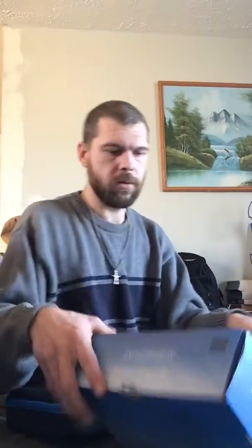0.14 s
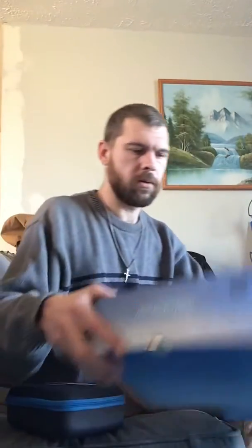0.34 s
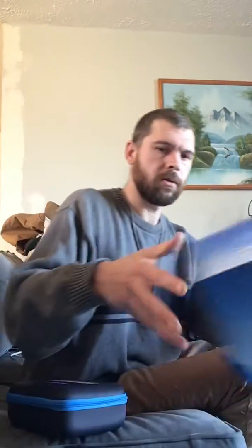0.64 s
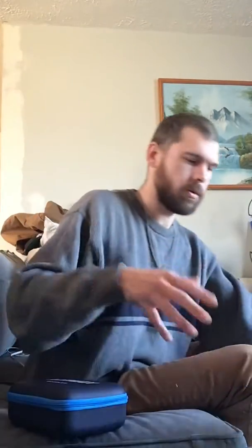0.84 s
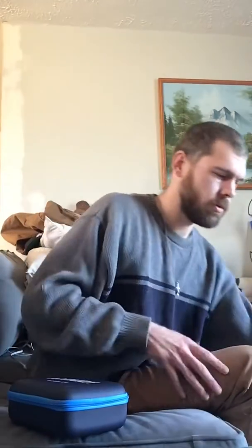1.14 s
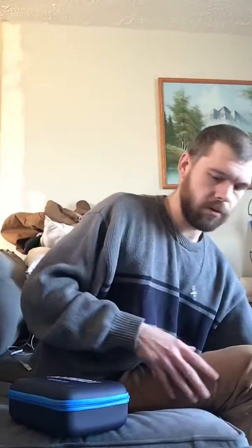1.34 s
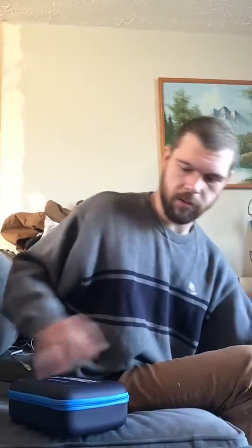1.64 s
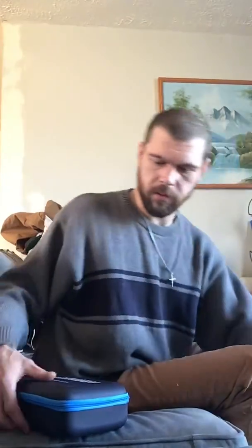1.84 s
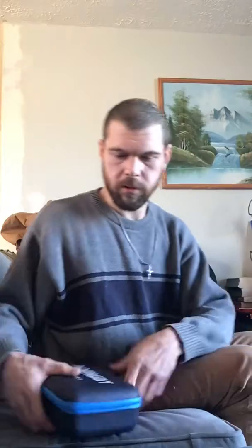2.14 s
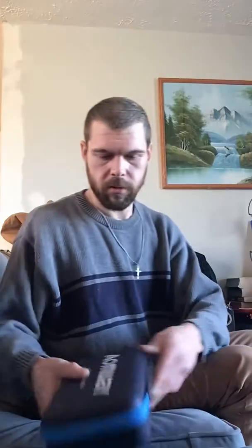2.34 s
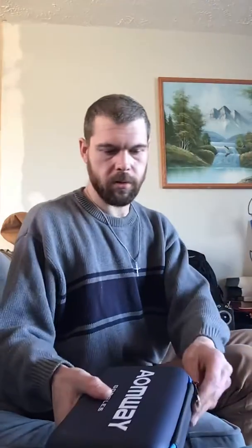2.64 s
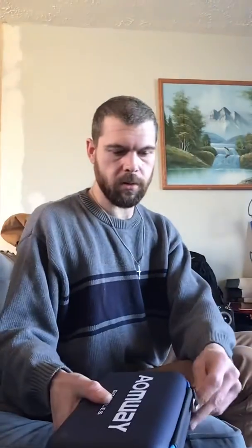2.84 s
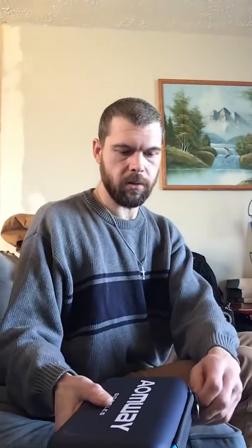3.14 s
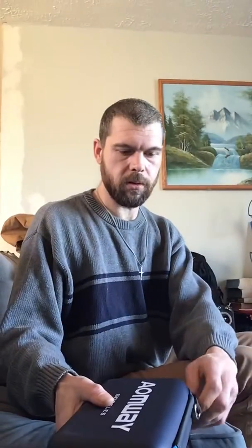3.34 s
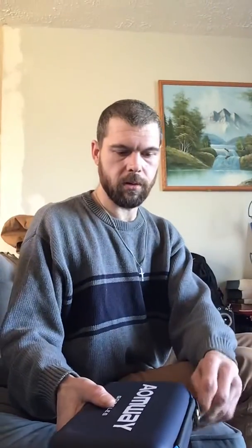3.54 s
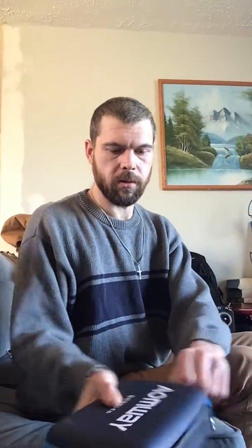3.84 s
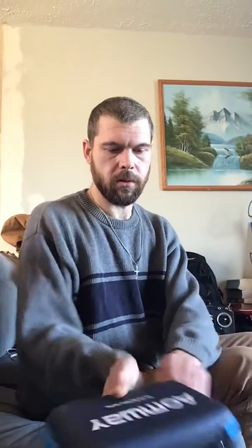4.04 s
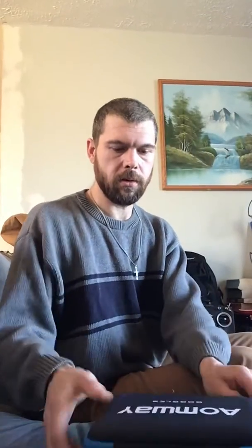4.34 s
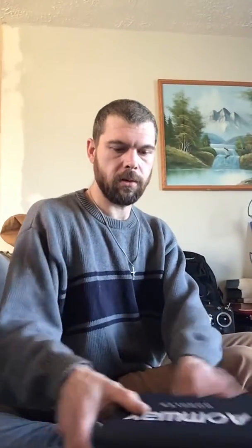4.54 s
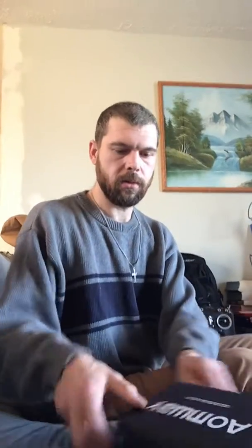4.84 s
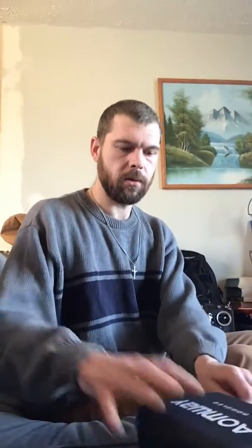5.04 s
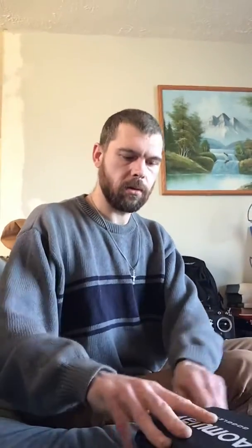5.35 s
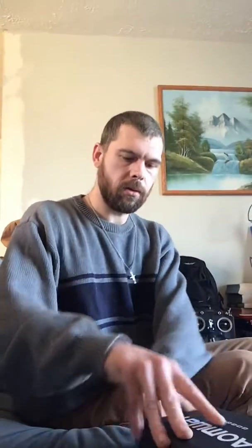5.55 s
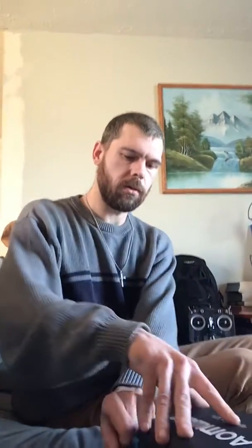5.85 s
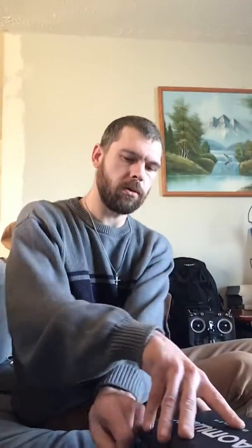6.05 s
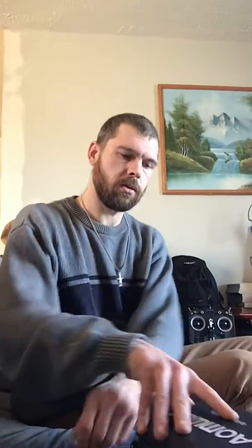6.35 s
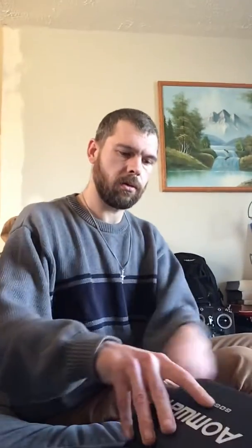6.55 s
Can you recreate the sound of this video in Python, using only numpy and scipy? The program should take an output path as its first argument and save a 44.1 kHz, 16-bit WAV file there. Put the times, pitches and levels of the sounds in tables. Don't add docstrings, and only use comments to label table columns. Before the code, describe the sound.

An empty cardboard box is rubbed, dropped aside with a boomy double bounce, then a hard case is handled and its zipper drawn in short rasps.

```python
import sys
import numpy as np
from scipy import signal
from scipy.fft import rfft, irfft, next_fast_len
from scipy.io import wavfile
from scipy.ndimage import uniform_filter1d

SR = 44100
rng = np.random.default_rng(int(sys.argv[2]) if len(sys.argv) > 2 else 0)


def log_audio(samples):
    frames = np.atleast_2d(samples).T
    limited = np.clip(frames, -1, 1)
    pcm = np.round(limited * 32767).astype(np.int16)
    wavfile.write(sys.argv[1], SR, pcm)


def to_linear_factor(level_db):
    exponent = np.asarray(level_db, float) / 20
    return 10 ** exponent


N = 294588


def evened(x):
    return x / np.sqrt(np.mean(x ** 2) + 1e-20)


def read(points, hz):
    f, value = np.transpose(points)
    return np.interp(np.log(hz + 1), np.log(f + 1), value)


def add(mix, s, sound):
    part = mix[round(s * SR):][:len(sound)]
    part += sound[:len(part)]


def coloured(x, points):
    size = next_fast_len(len(x))
    gain = to_linear_factor(read(points, np.fft.rfftfreq(size, 1 / SR)))
    return evened(irfft(rfft(x, size) * gain, size)[:len(x)])


def resonant(x, peaks):
    out = np.zeros(len(x))
    for k, (hz, width, db) in enumerate(peaks):
        r = np.exp(-np.pi * width / SR)
        poles = [1, -2 * r * np.cos(2 * np.pi * hz / SR), r * r]
        out += (-1) ** k * to_linear_factor(db) * (1 - r) * signal.lfilter([1, 0, -1], poles, x)
    return evened(out)


def ring(hz, t60, rise=0.00078):
    t = np.arange(round(0.36 * SR)) / SR
    return np.sin(2 * np.pi * hz * t) * to_linear_factor(-60 * t / max(t60, 0.003)) * (1 - np.exp(-t / rise))


def grit(per_s, spread_db):
    size = to_linear_factor(spread_db * np.minimum(rng.exponential(1, N), 4))
    return size * rng.standard_normal(N) * (rng.random(N) < per_s / SR)


def patchy(x, spread_db, frames_long, bins_wide):
    z = signal.stft(x, nperseg=256)[2]
    patches = rng.standard_normal(z.shape[::-1]).T
    patches = uniform_filter1d(uniform_filter1d(patches, bins_wide, 0), frames_long, 1)
    z = z * to_linear_factor(spread_db * evened(patches))
    return evened(signal.istft(z, nperseg=256)[1][:len(x)])


# (frequency [Hz], level [dB per Hz])
AIR_COLOUR = [(15, -44), (25, -1.5), (120, -3.5), (242, -7), (354, -2), (476, -13), (775, -9), (887, -18.5),
              (1230, -10.5), (1740, -15.5), (2280, -18), (2990, -19), (10100, -32), (12900, -32),
              (16000, -44)]
AIR_DB = -61
# (frequency [Hz], width [Hz], level [dB])
HUM = [(113.7, 8.7, -66.5), (149, 14, -69), (240, 18, -68.5)]


def air():
    frames, hz = N // 256 + 5, np.fft.rfftfreq(1024, 1 / SR)
    a, b, patches = rng.standard_normal((frames, 513, 3)).T
    patches = evened(uniform_filter1d(uniform_filter1d(patches, 20, 0), 12, 1))
    z = (a + 1j * b) * to_linear_factor(read(AIR_COLOUR, hz)[:, None] + 2.75 * patches)
    floor = signal.istft(z, nperseg=1024, noverlap=768)[1][:N]
    hum = sum(to_linear_factor(db) * resonant(rng.standard_normal(N), [(f, w, 0)]) for f, w, db in HUM)
    return to_linear_factor(AIR_DB) * evened(floor) + hum


# (frequency [Hz], time to fall 60 dB [s])
ECHO_TIMES = [(100, 0.35), (500, 0.23), (2000, 0.28), (8000, 0.28), (16000, 0.3)]


def room(x):
    echoes = np.zeros(SR // 2)
    at = np.arange(180, len(echoes) - 20, 20)
    echoes[at + rng.integers(0, 20, len(at))] = rng.choice([-1., 1.], len(at))
    hz, t, z = signal.stft(echoes, SR, nperseg=256)
    z = z * to_linear_factor(-60 * t / read(ECHO_TIMES, hz)[:, None])
    tail = signal.istft(z, SR, nperseg=256)[1]
    return signal.fftconvolve(x, tail / np.linalg.norm(tail))[:N]


# (time [s], peak level [dB], ring [Hz], time to fall 60 dB
# [s])
BUMPS = [(0.079, -45, 98, 0.093), (0.203, -43.5, 121, 0.1), (0.387, -42, 96, 0.086),
         (0.465, -47.5, 88.5, 0.19), (.365, -50, 790, 0.042), (.473, -46, 650, 0.058),
         (0.529, -43, 339, 0.054), (.538, -46, 560, .05), (0.937, -50, 267, 0.076),
         (1.798, -41, 171, 0.051), (2.071, -46.5, 258, 0.05), (2.126, -39, 235, 0.049),
         (2.438, -42.5, 142, 0.04), (2.871, -43.5, 251, 0.036), (2.987, -43, 592, 0.027),
         (3.256, -43.5, 172, 0.036), (3.677, -48, 247, 0.066), (3.877, -37.5, 240, 0.04),
         (4.041, -45.5, 261, 0.058), (4.207, -51, 153, 0.065), (4.616, -47.5, 179, 0.061),
         (4.742, -49, 387, 0.056), (4.899, -41.5, 195, 0.052), (5.065, -38, 200, 0.036),
         (5.07, -28, 317, 0.03), (5.082, -38, 250, .04), (5.094, -32, 128, 0.071), (5.158, -44, 159, 0.15),
         (5.172, -47, 140, 0.042), (5.22, -41, 300, 0.042), (5.229, -38.5, 620, .03),
         (5.247, -34.5, 407, 0.026), (5.265, -39, 303, 0.032), (5.236, -33.5, 226, 0.04),
         (5.255, -35.5, 240, 0.06), (5.344, -44.5, 229, 0.075), (5.714, -46.5, 176, 0.038),
         (6.037, -53, 420, 0.059), (6.309, -49.5, 340, 0.063)]


def bumps():
    out = np.zeros(N)
    for s, db, hz, t60 in BUMPS:
        thud = ring(hz, t60, rise=0.0019) + 0.38 * ring(1.6 * hz, 0.75 * t60, rise=0.00087)
        add(out, s, to_linear_factor(db + 4) * thud)
    return out


# (time [s], level [dB], ring [Hz], length [s])
SCUFFS = [(0.384, -49, 2950, 0.043), (0.529, -50.5, 550, 0.035), (0.569, -50, 1710, 0.04),
          (.595, -46.5, 1720, .018), (.628, -46.5, 1720, 0.023), (.632, -51, 3220, 0.032),
          (1.502, -37, 8960, 0.011), (1.508, -46, 5650, 0.043), (1.508, -44, 11500, 0.045),
          (1.525, -42, 12200, 0.052), (1.535, -50, 3500, 0.026), (1.538, -48, 6030, 0.046),
          (1.55, -52, 6800, 0.035), (1.682, -51, 3120, 0.048), (1.684, -52, 5800, 0.027),
          (1.7, -55, 7200, .06)]


def scuffs():
    out = np.zeros(N)
    for s, db, hz, length in SCUFFS:
        u = np.arange(3000) / SR / length
        noise = resonant(rng.standard_normal(3000), [(hz, 220, 0)])
        add(out, s, to_linear_factor(db) * noise * u ** 0.64 * np.exp(1 - 3.1 * u ** 2))
    return out


# (time [s], level [dB], ring [Hz], time to fall 60 dB [s])
JINGLES = [
    (6.094, -63, 15350, .06),
    (6.246, -63, 8450, .035),
    (4.8965, -33, 290, .03),
]
# (time [s], peak level [dB], ring [Hz])
SPARKS = [(.2309, -55.5, 6360), (.5243, -52, 6360), (.5871, -43, 5210), (.588, -50, 7600),
          (.639, -47, 7500), (2.262, -56, 12500), (2.27, -57.5, 13500), (2.3447, -55, 12900),
          (2.4001, -50, 6490), (2.42, -55, 12800), (2.845, -47, 8500), (2.8455, -52, 13000),
          (2.8525, -55, 13000), (2.853, -57, 8800), (2.869, -51, 5090), (2.886, -52, 6620),
          (2.9955, -51, 9500), (2.996, -51, 13500), (3.003, -50, 12500), (3.013, -54, 12500),
          (3.019, -53, 13000), (3.6503, -53, 6230), (3.7025, -50, 5170), (3.709, -51, 5400),
          (3.717, -50, 6100), (3.7245, -52, 4800), (3.772, -50, 7700), (3.8134, -48, 4820),
          (3.826, -48, 5300), (3.918, -50, 5200), (3.933, -51, 5000), (3.949, -52, 5200),
          (3.956, -52, 5300), (3.963, -50, 5300), (3.972, -54, 4600), (4.847, -48, 3300),
          (5.829, -52, 7290), (5.8689, -53, 4610), (5.87, -54, 7400), (6.034, -48, 13500),
          (6.0421, -53, 15400), (6.066, -55, 7410), (6.28, -57, 4500)]


def jingles():
    out = np.zeros(N)
    for s, db, hz, t60 in JINGLES:
        add(out, s, to_linear_factor(db) * ring(hz, t60))
    for s, db, hz in SPARKS:
        add(out, s, to_linear_factor(db) * ring(hz, t60=0.009, rise=0.0004))
    return out


# (time [s], peak level [dB], ring [Hz])
KNOCKS = [(.0847, -32, 1610), (.1514, -53, 1630), (.388, -39, 3050), (2.0493, -46, 1140),
          (2.1261, -39, 1210), (2.2646, -39, 1650), (2.838, -50, 1600), (2.7458, -50, 1150),
          (2.8928, -45, 1240), (3.257, -48, 1400), (3.3473, -50, 1790), (3.4644, -54, 1550),
          (4.8478, -42.5, 1760), (4.92, -48, 1670), (6.0606, -43, 1640), (6.2445, -51, 1690),
          (6.312, -46, 1670)]
# (time [s], peak level [dB], ring [Hz])
CLICKS = [(.4718, -46, 1830), (.5294, -53, 1430), (.5556, -41, 1800), (.9712, -47, 1810),
          (1.5028, -39, 1800), (1.5625, -47, 1780), (1.608, -46, 1800), (5.2465, -45, 1090),
          (1.7041, -33, 1620), (2.995, -42, 1500), (5.81, -51, 1600), (5.85, -51, 1600), (5.876, -51, 1600),
          (5.898, -46, 1600), (5.918, -49, 1610), (6.068, -47, 2500), (2.846, -41, 1670),
          (2.3381, -47, 1340), (2.8695, -43, 1510), (2.9887, -35.5, 1610), (3.0869, -49, 1700),
          (3.3648, -51, 1350), (3.6094, -49, 1740), (3.6193, -45, 1780), (4.8395, -41.5, 1610),
          (5.0629, -47, 1390), (5.094, -42, 1730), (5.672, -49, 1900), (5.797, -50, 1440),
          (5.83, -44.5, 1570), (5.886, -46, 1520), (5.893, -40, 1590), (5.91, -40.5, 1670),
          (5.9244, -48, 1950), (6.0348, -49, 1850), (6.044, -41, 1260), (6.0818, -45, 1220),
          (6.3814, -50, 1670)]
# (time [s], peak level [dB], ring [Hz])
TEETH = [(3.6361, -52, 1740), (3.6516, -42, 1670), (3.665, -40, 1730), (3.678, -37.5, 1600),
         (3.6873, -38, 1730), (3.696, -41, 1740), (3.703, -44, 1800), (3.7085, -41, 1650),
         (3.7155, -45, 1500), (3.7215, -45, 1600)]
KNOCK_EDGE_DB, CLICK_EDGE_DB, TOOTH_EDGE_DB = -34, -12.5, -20


def ticks():
    out, t = np.zeros(N), np.arange(512) / SR
    snap = resonant((t == 0).astype(float), [(1000, 960, 0), (3270, 2800, 0)])
    snap = snap / abs(snap).max()
    kinds = ((KNOCKS, KNOCK_EDGE_DB), (CLICKS, CLICK_EDGE_DB), (TEETH, TOOTH_EDGE_DB))
    for rows, edge_db in kinds:
        for s, db, hz in rows:
            edge = resonant(rng.standard_normal(len(t)), [(6500, 1200, 7), (13200, 6100, -6)])
            edge = edge * to_linear_factor(-60 * t / 0.0055)
            add(out, s, to_linear_factor(db - 4) * ring(hz, 0.015, rise=0.00026))
            add(out, s, to_linear_factor(db - 6) * snap + to_linear_factor(db + edge_db + 2) * edge)
    return out


# (frequency [Hz], level [dB per Hz])
SCRAPE = [(290, -42), (500, -30), (589, -3), (786, -4.5), (1000, -4), (1540, -4.5), (1730, 1.5),
          (2200, -9.5), (2920, -2.5), (3470, -10), (3970, -9.5), (4240, -14), (5000, -10.5), (6500, -25),
          (11000, -120)]
HISS = [(2060, -26), (3500, -7), (4940, -8), (5460, -1.5), (6340, -2.5), (6960, 1), (9110, -4.5),
        (10100, -7.5), (11900, -2.5), (14500, -5.5), (15600, -17)]
RUMBLE = [(24, -42), (40, -19), (92, -6.5), (151, -4), (220, -11.5), (322, -5.5), (501, -12.5), (570, -9),
          (900, -20), (1170, -28), (1980, -120)]
# (time of firmest touch [s], scrape level [dB], hiss over scrape [dB],
#                time to swell 20 dB [s], time to fade 20 dB [s])
CARD_RUBS = [
    (.025, -48, 1.6, -11, 0.22),
    (.396, -53.5, -6.5, 0, 0.18),
    (.65, -59.5, 2.5, 0.5, 0.13),
    (.98, -68.5, -6, 2, 0.4),
    (1.33, -50.5, 3.5, 0.03, 0.32),
    (1.44, -53, 7, 0.24, 0.21),
]
FLAP_RUBS = [
    (1.504, -62, 15, 0.004, .05),
    (1.52, -56, 18.3, 0.039, 0.054),
    (1.54, -53, 15.6, 0.033, 0.05),
    (1.555, -54, 14, .04, 0.024),
    (1.575, -53, 6.4, .04, 0.05),
    (1.605, -52, 4.8, 0.11, 0.058),
    (1.69, -53, 4, 0.015, 0.055),
    (1.705, -44.5, 2.8, 0.034, 0.052),
    (1.722, -50.5, 2.4, .03, 0.073),
]
CASE_RUBS = [(2.03, -69, 0, 0.63, 0.34), (2.14, -64, -16, 0.35, 0.13), (2.345, -66, 2.5, .02, .06),
             (2.428, -63.5, -1.5, 0.24, 0.3), (2.6, -75.5, -5, 0.36, .8), (2.884, -61.5, -6, 0.092, 0.046),
             (2.996, -57.5, -5, 0.011, 0.041), (3.268, -69, -13, 0.18, 0.048), (3.474, -72, -7, 0.36, 0.14),
             (3.7, -64, -2, 0.16, 0.1), (4.01, -63, -3, 0.35, 0.5), (4.115, -60, -18, 0.044, 0.03),
             (4.2, -67, -0.5, 0.34, 0.21), (4.64, -66.5, -3.5, 0.08, 0.45), (4.77, -61.5, -3, 0.14, 0.3),
             (4.894, -67.5, -3.5, .4, 0.085), (5.125, -63.5, 3, 0.12, 0.087), (5.9, -61, -8, 0.27, 0.12),
             (6.044, -58.5, -5, 0.011, 0.17), (6.32, -67, -6.5, 0.34, 0.32), (6.48, -77, 5, 0.12, .1),
             (6.62, -74, -8, 0.58, .45)]
CARD_RUMBLE_DB, FLAP_RUMBLE_DB, CASE_RUMBLE_DB = -0.56, -10, 2
HISS_STEEP, RUMBLE_STEEP = 1.42, 0.95


def hands():
    scrape = patchy(coloured(grit(6000, 1.9), SCRAPE), 2.5, frames_long=5, bins_wide=4)
    hiss = patchy(coloured(grit(9000, 2.1), HISS), 2.8, frames_long=4, bins_wide=5)
    rumble = coloured(grit(600, 3.55), RUMBLE)
    t, power = np.arange(0, N + 64, 64) / SR, 0
    surfaces = ((CARD_RUBS, CARD_RUMBLE_DB), (FLAP_RUBS, FLAP_RUMBLE_DB), (CASE_RUBS, CASE_RUMBLE_DB))
    for rows, rumble_db in surfaces:
        for s, db, hiss_db, swell, fade in rows:
            slack_db = -20 * np.maximum((s - t) / swell, (t - s) / fade)
            levels = [db + slack_db,
                      db + hiss_db + HISS_STEEP * slack_db,
                      db + rumble_db + RUMBLE_STEEP * slack_db]
            power = power + to_linear_factor(levels) ** 2
    layers = zip(power, (scrape, hiss, rumble))
    return sum(np.interp(np.arange(N) / SR, t, np.sqrt(p)) * layer for p, layer in layers)


# (time [s], peak level [dB], bass over usual [dB],
#                                            treble over peak [dB], small panels over usual [dB])
DROPS = [(1.1275, -21.5, -9.5, -10.5, -6), (1.132, -20.5, -1, -6.5, -5), (1.136, -18, -25, -16.5, 8),
         (1.144, -18, -26, -10, 4), (1.152, -21, 5, -12.5, -13), (1.169, -40, -1, -6, 3),
         (1.308, -19, -7.5, -13, -5.5), (1.319, -25, -3, -17, -6), (1.334, -27.5, -10, -18, -9),
         (1.352, -28, 0, -20, 3), (1.364, -32, 4, -14, -7), (1.19, -36, -4, -14, -4)]
# (frequency [Hz], width [Hz], level [dB])
BOX_PANELS = [(157, 50, 8.5), (237, 48, 9), (290, 77, 3.5), (407, 23, 7), (542, 106, -3), (701, 22, 3.5),
              (815, 59, -6), (1015, 200, -1), (1340, 104, -1.5), (1470, 77, -13), (1610, 170, -6),
              (1740, 95, -2.5), (2000, 180, -16)]
# (frequency [Hz], level [dB per Hz])
BOX_CRACK = [(180, -16), (300, -1.5), (621, -3), (709, -2.5), (1110, -10.5), (1760, 3.5), (2010, -8),
             (3410, -8.5), (3960, -14.5), (12600, -27.5), (15600, -39)]
# (time [s], peak level [dB], ring [Hz], time to fall 60 dB [s])
RINGING_PANELS = [(1.132, -17.5, 1702, 0.042), (1.1392, -18.5, 160.6, 0.103), (1.1452, -13, 1720, 0.033),
                  (1.133, -24, 1037, .08), (1.134, -23.5, 410, .08), (1.143, -27, 3100, 0.045),
                  (1.309, -27.5, 1000, .04), (1.157, -28, 703, 0.088), (1.168, -24.5, 713, .06),
                  (1.175, -35, 1730, 0.045), (1.193, -38, 1650, 0.1), (1.209, -35, 1740, 0.071),
                  (1.3107, -26.5, 242, 0.086), (1.321, -27.5, 690, 0.065), (1.3215, -29, 1104, .04),
                  (1.316, -29, 1500, .05), (1.335, -28, 148.7, 0.11), (1.344, -23.5, 698, 0.058),
                  (1.351, -34, 1760, 0.054), (1.371, -30, 296, .05), (1.389, -36, 695, 0.033)]


def box():
    out, t = np.zeros(N), np.arange(round(0.3 * SR)) / SR
    for s, db, bass_db, treble_db, small_db in DROPS:
        shake, jolt = rng.standard_normal((len(t), 2)).T
        rattle = shake * (to_linear_factor(-60 * t / 0.039) + 0.1 * to_linear_factor(-60 * t / 0.23))
        peaks = [(f, w, d + bass_db * (f < 500) + small_db * (f > 1200)) for f, w, d in BOX_PANELS]
        panels = resonant(rattle, peaks)
        crack = coloured(jolt, BOX_CRACK) * (to_linear_factor(-60 * t / 0.04) + 0.45 * to_linear_factor(-60 * t / 0.24))
        add(out, s, to_linear_factor(db) * panels / abs(panels).max())
        add(out, s, to_linear_factor(db + treble_db + 3) * crack)
    for s, db, hz, t60 in RINGING_PANELS:
        add(out, s, to_linear_factor(db) * ring(hz, t60, rise=0.0013))
    return out


# (frequency [Hz], width [Hz], level [dB])
SLIDER = [(940, 1500, -5), (1090, 140, -6), (1730, 390, 2.5), (2290, 360, 4), (2750, 640, -1.5),
          (4080, 400, -11), (5200, 430, -14.5), (7800, 530, -21)]
# (frequency [Hz], width [Hz], level [dB])
SHELL = [(240, 150, 0.5), (333, 202, 5)]
# (frequency [Hz], level [dB per Hz])
FIZZ = [(1760, -6.5), (3000, -9), (3330, -18), (3890, -4.5), (4230, -2.5), (7720, -5), (10200, -14.5),
        (13100, -9.5), (16000, -24)]
TAB_WIDTH_HZ = 165
USUAL_PER_S, FIZZ_DB_PER_OCTAVE, SHELL_DB_PER_OCTAVE = 352, 10.5, -3


def pull(rows, force_db, tab_hz, second, rough, fizz_db, shell_db, tab_db):
    s, speed = np.transpose(rows)
    t = np.arange(s[0], s[-1], 1 / SR)
    db = np.interp(t, s, force_db)
    per_s = uniform_filter1d(np.interp(t, s, speed), 300)
    octaves = np.log2(per_s / USUAL_PER_S)
    wobble, uneven, noise = rng.standard_normal((len(t), 3)).T
    wobble = evened(uniform_filter1d(wobble, 60))
    turns = 2 * np.cumsum(per_s * (1 + 0.15 * rough * wobble)) / SR
    snap = np.diff(np.floor(turns), prepend=0) * to_linear_factor(1.5 * rough * np.clip(uneven, -1.5, 1.5))
    snap *= np.where(np.floor(turns) % 2, 1, np.clip(second, 0, 1))
    dense = np.sqrt(uniform_filter1d(snap ** 2, 900) + 1e-5)
    puffs = noise * (0.22 + signal.lfilter([1], [1, -0.97], snap))

    drive = (snap + 0.5 * rough * puffs) / dense
    slider = resonant(drive, SLIDER)
    tab = resonant(drive, [(tab_hz, TAB_WIDTH_HZ, 0)])
    shell = resonant((snap + 0.25 * rough * puffs) / dense, SHELL)
    fizz = coloured((0.22 * snap + 1.1 * puffs) / dense, FIZZ)

    whole = patchy(slider, 4.5 * rough, frames_long=4, bins_wide=3)
    shell_gain = to_linear_factor(shell_db + SHELL_DB_PER_OCTAVE * octaves)
    whole = whole + shell_gain * patchy(shell, 2.6, frames_long=6, bins_wide=1)
    fizz_gain = to_linear_factor(fizz_db + FIZZ_DB_PER_OCTAVE * octaves)
    whole = whole + fizz_gain * patchy(fizz, 2.3, frames_long=10, bins_wide=4)
    whole = whole + to_linear_factor(tab_db) * patchy(tab, 5.5, frames_long=4, bins_wide=3)
    return s[0], to_linear_factor(db) * whole * signal.windows.tukey(len(t), 0.04)


# (time [s], speed [tooth pairs per s])
PULLS = [
    [(3.7, 120), (3.725, 210), (3.76, 393), (3.785, 300), (3.835, 430), (3.868, 527), (3.885, 405),
     (3.91, 300), (3.96, 230)],
    [(4.445, 155), (4.465, 225), (4.481, 368), (4.499, 496), (4.511, 500), (4.553, 415), (4.571, 330),
     (4.593, 166), (4.62, 124)],
    [(5.085, 141), (5.097, 138), (5.14, 133), (5.17, 95), (5.21, 115), (5.25, 198), (5.28, 215),
     (5.305, 230), (5.33, 210)],
    [(5.33, 210), (5.36, 251), (5.42, 313), (5.46, 376), (5.5, 350), (5.56, 374), (5.6, 317), (5.63, 394),
     (5.69, 316)],
]
FORCES = [
    [-64, -60.5, -56.5, -57.5, -53, -53.5, -47.5, -60, -62.5],
    [-71, -55.5, -51.5, -53, -52, -49.5, -56, -62, -60],
    [-62, -56, -60, -64, -61.5, -58.5, -54, -55.5, -70],
    [-77, -64, -57.5, -55.5, -57.5, -58, -62, -64.5, -71],
]
TAB_HZ = [1650, 1160, 1760, 1200]
# (share of second tooth row [0-1], roughness [0-1], fizz over slider [dB],
#                     shell over slider [dB], tab over slider [dB])
GRIPS = [
    (.3, .36, -4, 1, -10),
    (.6, .27, -3.5, -3, -10),
    (.2, .38, -6, -1.5, -3),
    (.1, .55, -4, 4, -2),
]


def zipper():
    out = np.zeros(N)
    for rows, force_db, tab_hz, grip in zip(PULLS, FORCES, TAB_HZ, GRIPS):
        add(out, *pull(rows, force_db, tab_hz, *grip))
    return out


def scene():
    near = bumps() + scuffs() + jingles() + ticks() + hands() + zipper()
    far = box()
    echoes = room(to_linear_factor(-7.5) * near + to_linear_factor(-6) * far)
    return (near + far + echoes + air())[None]


def top_cut(x):
    return signal.sosfilt(signal.butter(12, 16390, fs=SR, output="sos"), x)


def record(dry):
    no_bass = signal.butter(4, 43, "high", fs=SR, output="sos")
    no_top = signal.ellip(8, 0.3, 60, 16000, fs=SR, output="sos")
    heard = signal.sosfilt(np.vstack([no_bass, no_top]), dry)
    return top_cut(heard)


dry = scene()
out = record(dry)
log_audio(out)
```